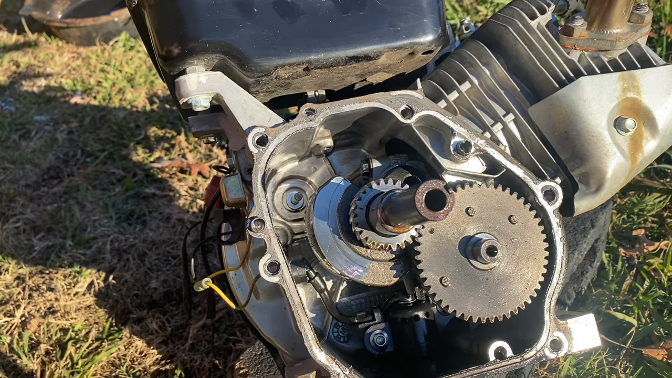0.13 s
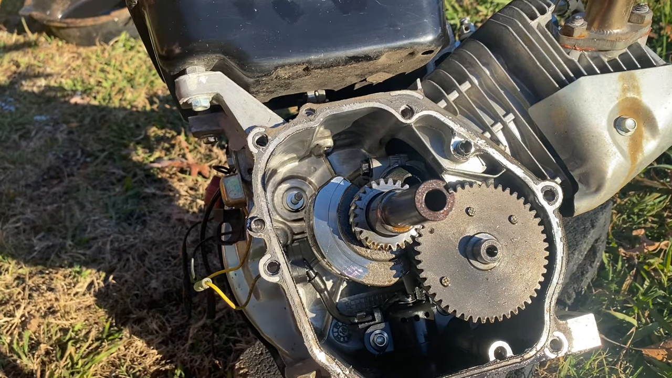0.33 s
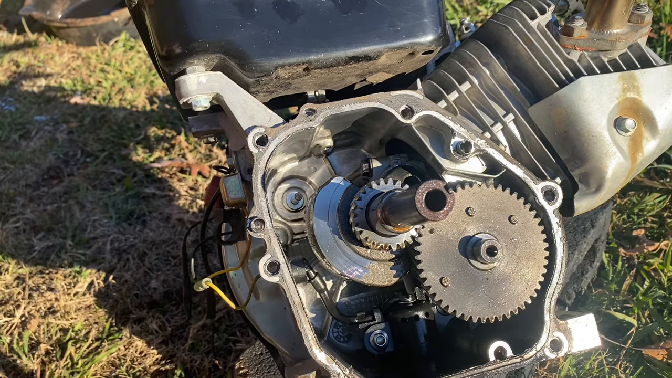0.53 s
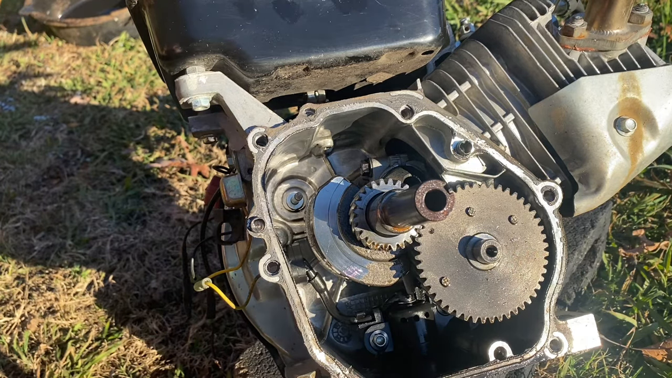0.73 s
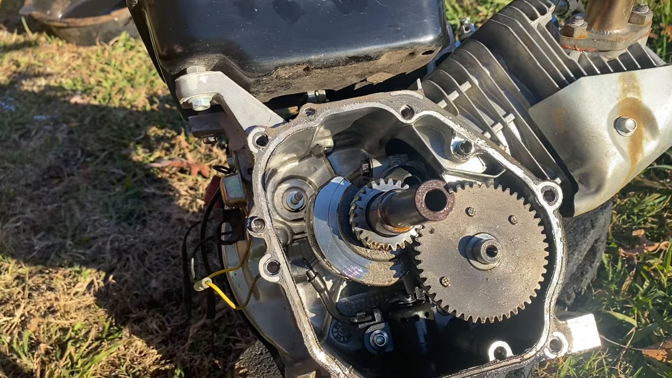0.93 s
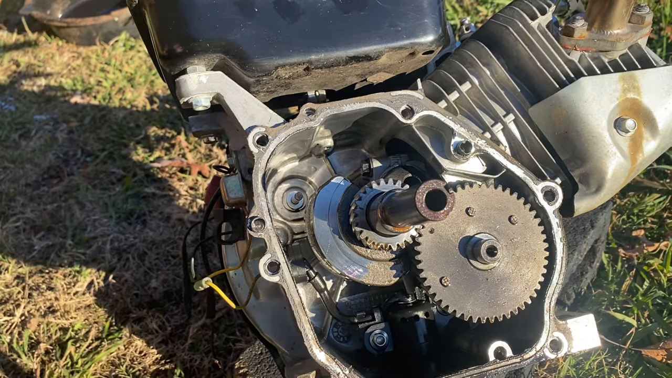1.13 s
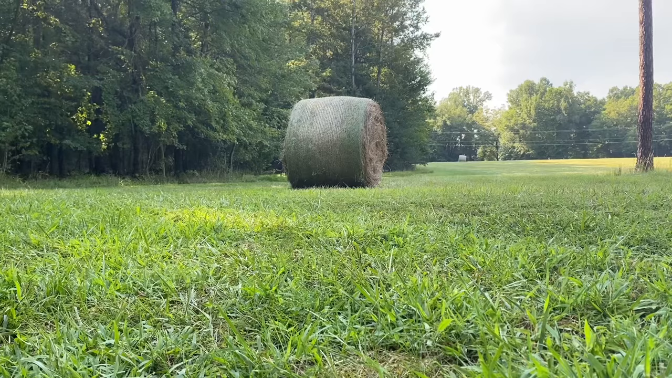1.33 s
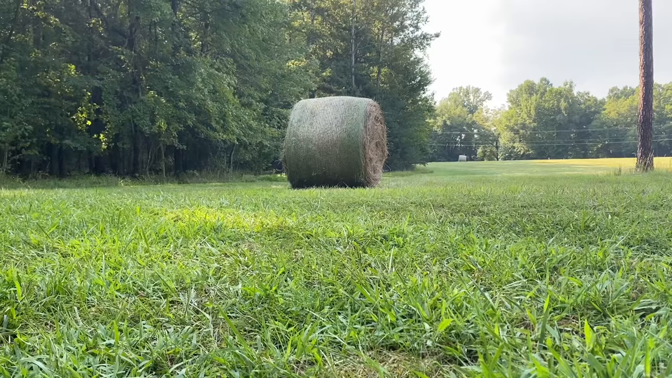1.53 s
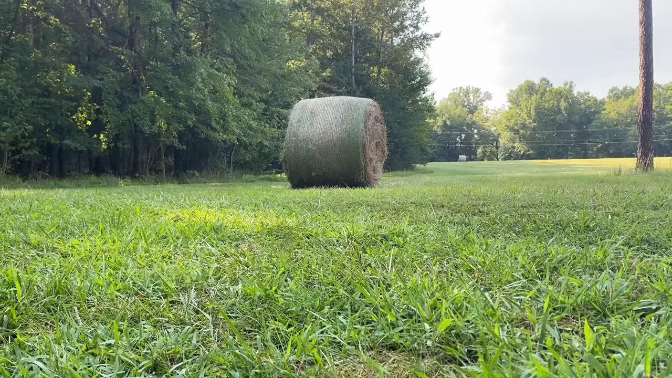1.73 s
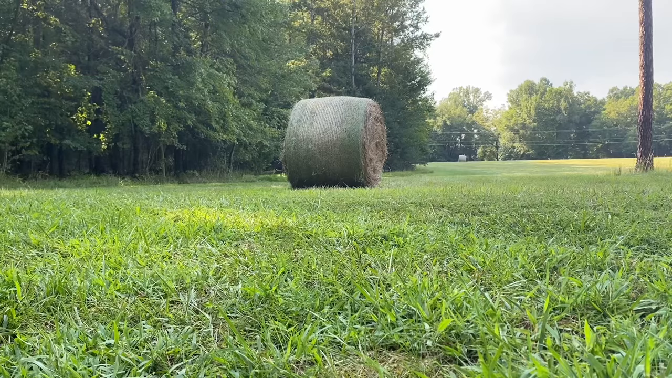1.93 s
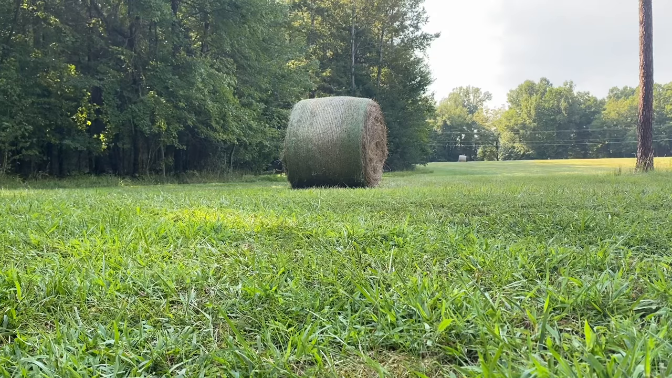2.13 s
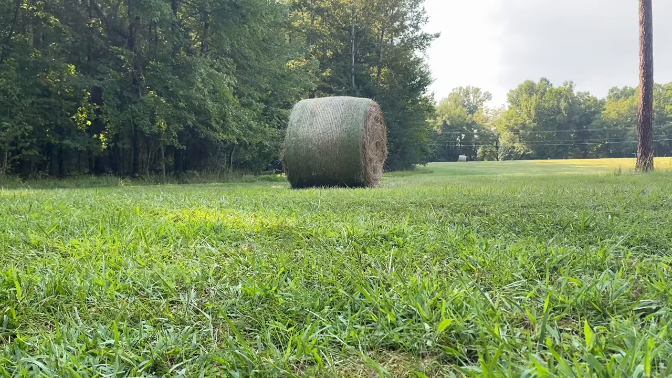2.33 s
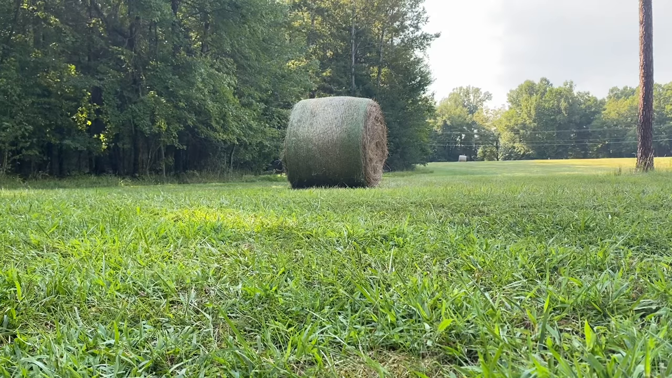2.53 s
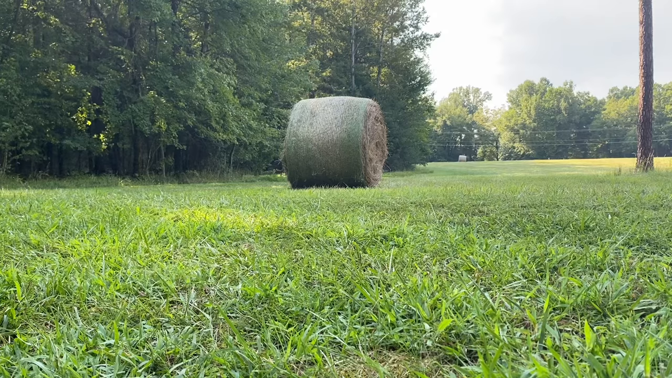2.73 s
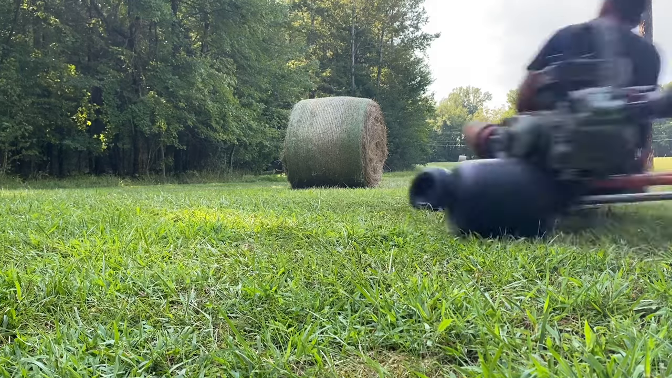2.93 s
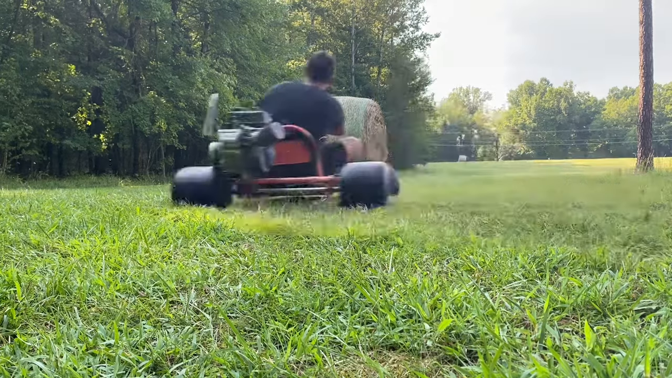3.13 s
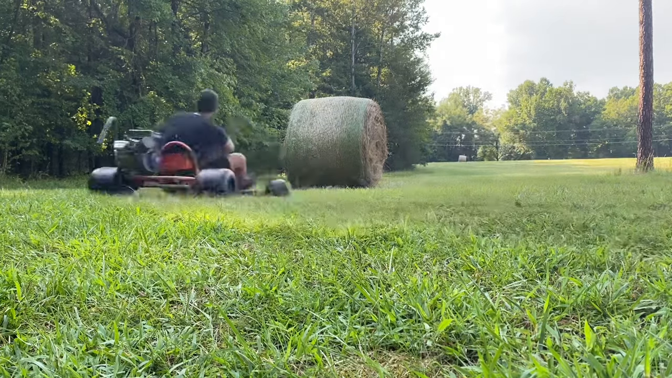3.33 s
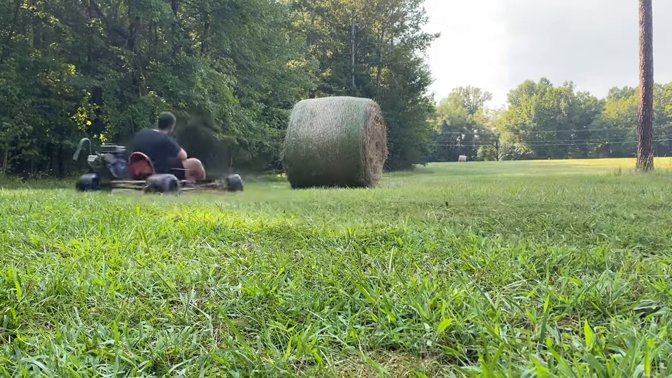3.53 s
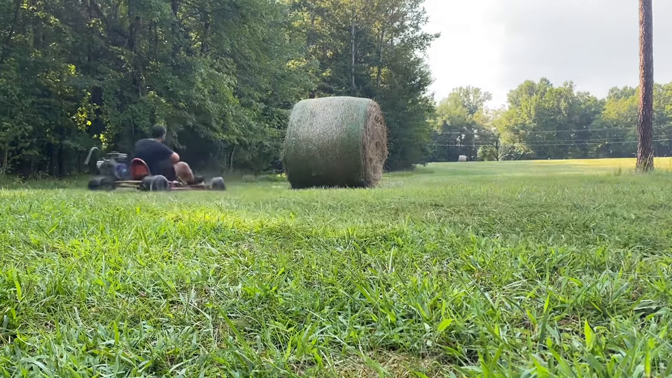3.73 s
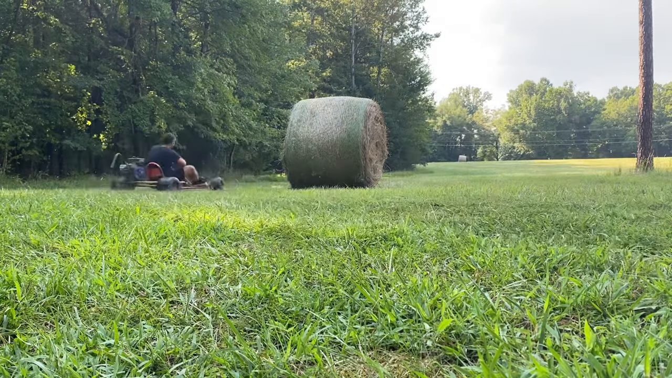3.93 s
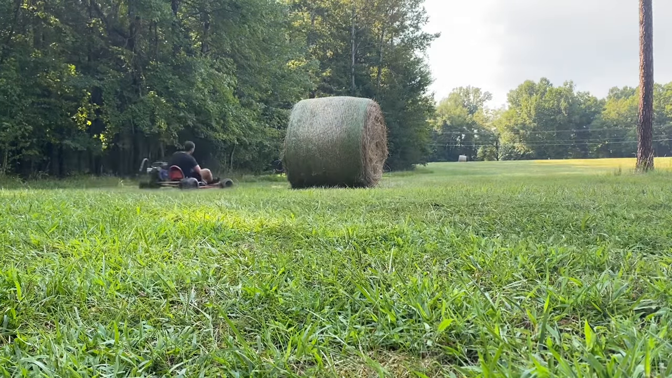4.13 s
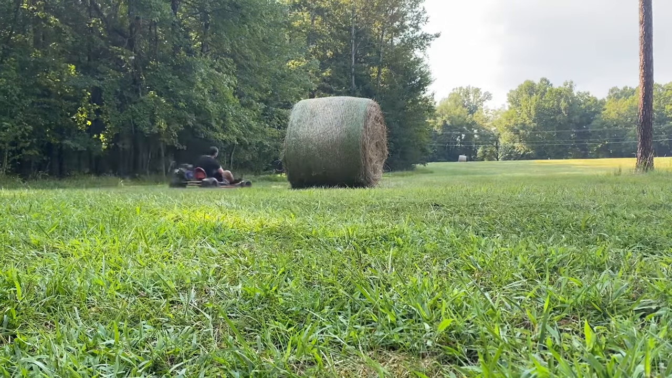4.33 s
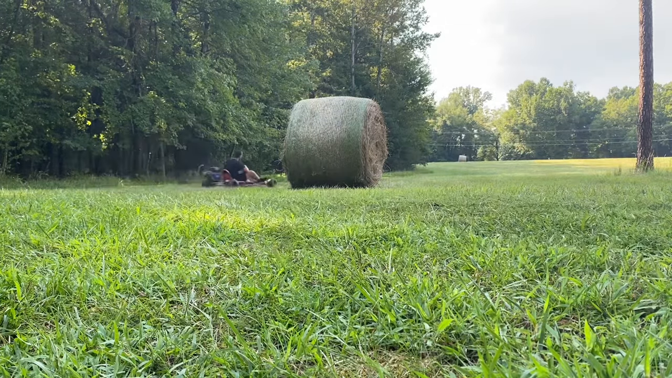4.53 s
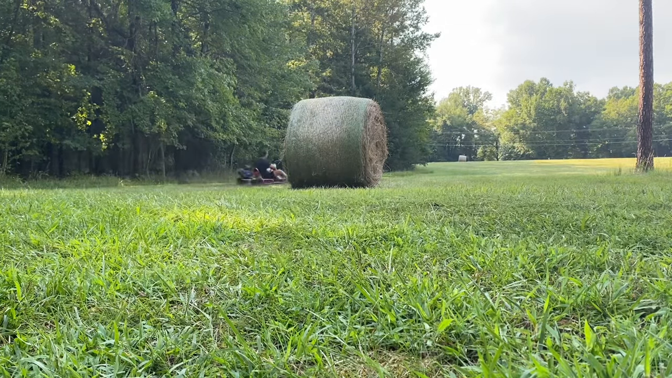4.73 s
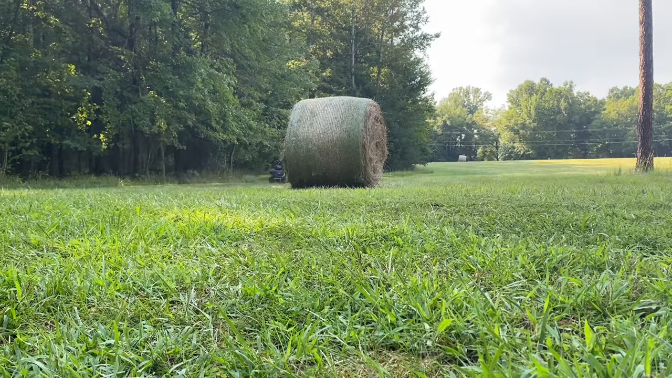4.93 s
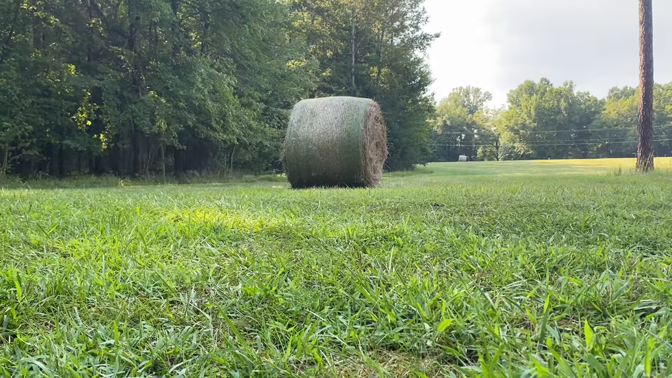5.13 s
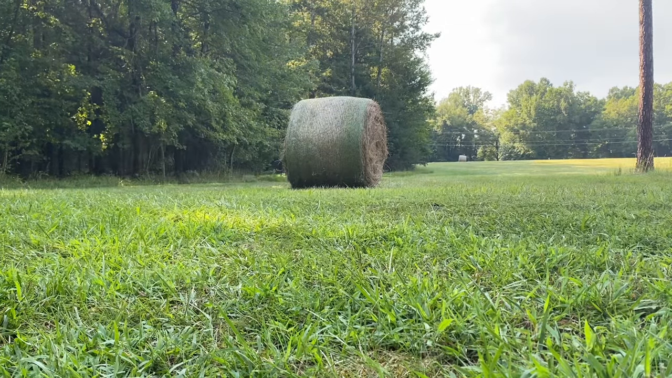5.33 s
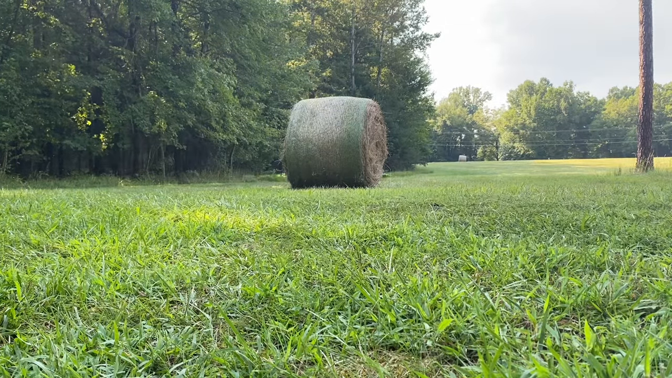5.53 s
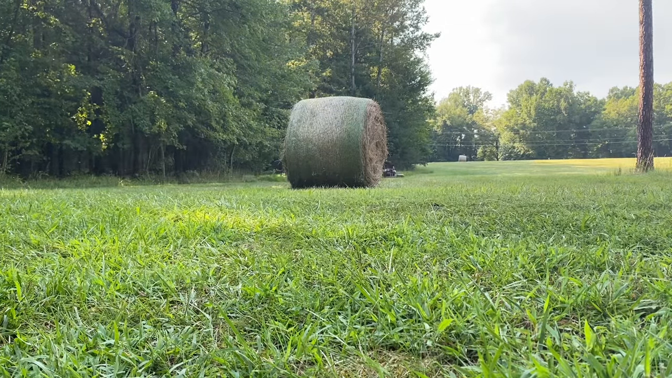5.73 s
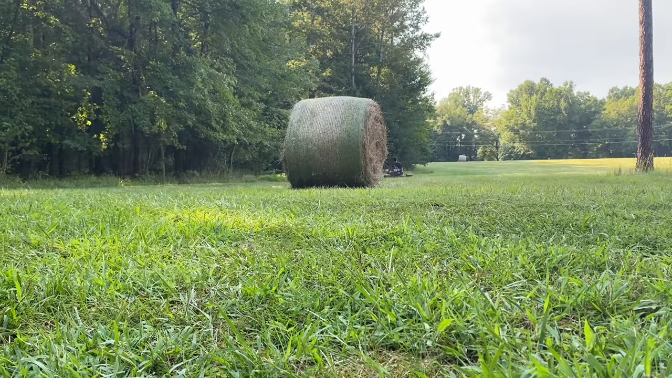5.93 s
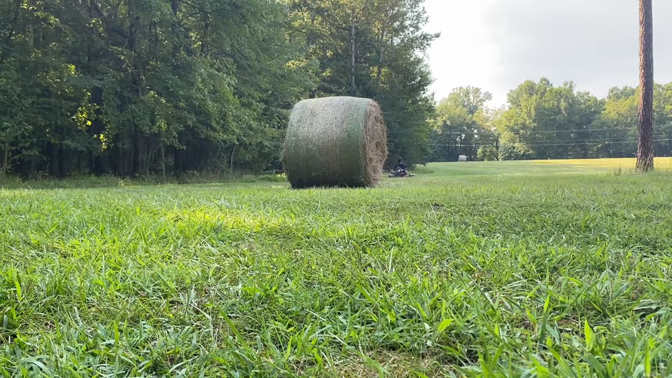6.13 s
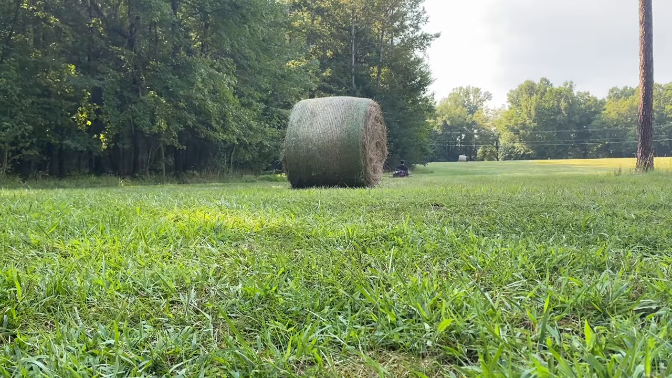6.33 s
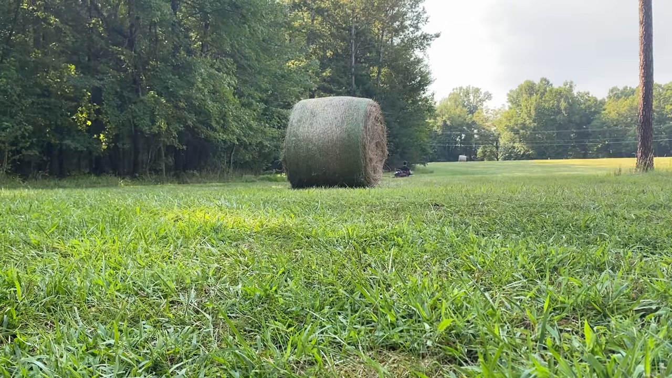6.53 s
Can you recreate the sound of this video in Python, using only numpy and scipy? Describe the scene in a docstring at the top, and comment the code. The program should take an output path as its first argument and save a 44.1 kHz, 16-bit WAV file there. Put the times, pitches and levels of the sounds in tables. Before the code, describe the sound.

A quiet yard with a faint far motor hum cuts abruptly to a go-kart engine roaring up, passing close and droning away over grass.

```python
"""A quiet yard with a far motor hum gives way abruptly to a go-kart on a grass field.
Its single-cylinder four-stroke comes up from behind, passes close by at about 2.9 s and drives off.
Every firing is a burst of noise, the crack of gas, and a click that rings the exhaust's resonances.
Filtered noise makes the yard air, the chain and tyres underneath and a soft rush in the distance."""
import sys
import numpy as np
from scipy import signal
from scipy.fft import rfft, irfft, next_fast_len
from scipy.io import wavfile
from scipy.ndimage import map_coordinates

SR = 44100
rng = np.random.default_rng(int(sys.argv[2]) if len(sys.argv) > 2 else 0)


def unload_audio(sound):
    """Save the sound as a 16-bit wav file, at the path given as the first command line argument."""
    columns = np.transpose(np.atleast_2d(sound))
    # keep every value between -1 and 1, then stretch to whole-number steps
    steps = np.round(np.clip(columns, -1, 1) * 32767)
    wavfile.write(sys.argv[1], SR, steps.astype(np.int16))


N = 289737
TIME = np.arange(N) / SR
KART_START_S = 1.2455
PASS_S, TURN_S = 2.87, 0.092   # when the kart goes by, and how fast its front view turns into its rear view
NEAR_M = 2   # distance at which the near levels hold
CRUISE_HZ = 35.13   # firings per second around which pitch and load vary
TREBLE_LAG_MS = (0.416, -0.021)   # left later than right: from the front, from behind

# Engine speed. Each row: time in seconds, firings per second.
FIRING_RATE = [(1.246, 33.56), (1.62, 34.52), (1.78, 36.73), (2.08, 38.35), (2.18, 39.84), (2.58, 39.77),
               (2.89, 38.61), (3.01, 36.93), (3.24, 35.43), (3.44, 35.44), (3.55, 32.99), (3.7, 34.6),
               (3.86, 33.26), (4.01, 34.41), (4.11, 33.8), (4.57, 34.23), (4.74, 32.69), (4.97, 35.31),
               (5.35, 32.11), (5.64, 34.99), (6.15, 34.65), (6.57, 32.05)]
# Path of the kart. Each row: time in seconds, distance in metres.
KART_DISTANCE = [(1.25, 7.8), (1.95, 4.06), (2.55, 3.81), (2.8, 1.94), (2.97, 2.18), (3.25, 4.26),
                 (4.4, 9.47), (5.05, 15.6), (6.57, 22.3)]


def from_db(db):
    """A level in decibels is twenty times the logarithm of the amplitude gain."""
    return 10 ** (np.asarray(db) / 20)


def rms_one(x):
    """Mean power is the mean squared signal; scale it to one."""
    return x / np.sqrt(np.mean(x ** 2) + 1e-20)


def in_time(rows):
    """Linear interpolation gives each column of a curve at every sample."""
    s, *columns = np.transpose(rows)
    return [np.interp(TIME, s, c) for c in columns]


def panned(db):
    """Level difference between the sides places a sound: left and right gains, positive to the left."""
    return from_db(np.array([[1], [-1]]) * db / 2)


def drift(rate):
    """Slow random modulation: chance points, rate per second, joined by lines; rms 1."""
    points = rng.standard_normal(int(N / SR * rate) + 2)
    return rms_one(np.interp(TIME * rate, np.arange(len(points)), points))


def noise(colour, alike, low_hz=20, high_hz=17000):
    """Spectral shaping of white noise; alike is the left-right correlation; rms 1."""
    size = next_fast_len(N)
    hz = np.arange(size // 2 + 1) * SR / size + 1e-3
    points, alike = np.array(colour), np.clip(alike, 0, 1)
    gain = from_db(np.interp(np.log(hz), np.log(points[:, 0]), points[:, 1]))
    gain = gain / np.sqrt((1 + (low_hz / hz) ** 12) * (1 + (hz / high_hz) ** 12))   # band edges
    mid, side = irfft(rfft(rng.standard_normal((2, size))) * gain, size)[:, :N]
    return rms_one(np.sqrt(1 + alike) * mid + np.sqrt(1 - alike) * np.array([side, -side]))


def ring(x, hz, width_hz):
    """Damped resonance: a unit click starts a decaying sine of height 1, shorter for a greater width."""
    radius = np.exp(-np.pi * width_hz / SR)
    angle = 2 * np.pi * hz / SR
    feedback = [1, -2 * radius * np.cos(angle), radius * radius]
    return signal.lfilter([0, np.sin(angle)], feedback, x + 1e-18)


def swell(s, db, hz, width_hz, length_s):
    """Resonant noise under a bell-shaped envelope: it comes and goes around time s."""
    envelope = np.exp(-((TIME - s) / length_s) ** 2)
    return from_db(db) * envelope * rms_one(ring(rng.standard_normal(N), hz, width_hz))


def passing(front, behind, turn_s=TURN_S):
    """Directivity: a value swings from its front to its rear setting as the kart goes by."""
    return front + (behind - front) * (1 + np.tanh((TIME - PASS_S) / turn_s)) / 2


def carried(near_db, front_db, loss_db):
    """Spreading loss per doubling of distance, with extra level from the front."""
    doublings = np.log2(in_time(KART_DISTANCE)[0] / NEAR_M)
    return from_db(near_db + passing(front_db, 0) - loss_db * doublings)


def behind_bale():
    """Acoustic shadow: how deep the kart is behind a hay bale that hides it for a while, 0-1."""
    centre_s, half_s = 5.418, 0.28
    return np.exp(-((TIME - centre_s) / half_s) ** 2)


def late_left(left, right, lag_ms):
    """Time difference between the sides: delay left against right by the (front, behind) lag."""
    lag = passing(*lag_ms) * SR / 1000   # samples
    n = np.arange(N)
    late = map_coordinates(left, [n - lag / 2], order=3)
    early = map_coordinates(right, [n + lag / 2], order=3)
    return np.array([late, early])


def yard():
    """Superposition of coloured air noise in light gusts, far motor tones, rustles and ticks."""
    # Each row: frequency in Hz, relative spectral level in dB.
    air_colour = [(15, -55), (25, -33), (48, -0.5), (128, -15.5), (176, -24), (415, -36), (450, -39),
                  (1000, -43), (1860, -46), (3350, -56.5), (5570, -58.5), (6540, -65), (15000, -69)]
    # Tones of the far motor. Each row: frequency in Hz, mean level in dB before panning.
    hum_tones = [(59.5, -62), (90, -55.5), (120.4, -52)]
    # Small sounds, then faint rustles. Each row: centre time in seconds, level in dB before panning,
    # resonance in Hz, its width in Hz, length in seconds.
    small_ticks = [(0.123, -67, 5800, 700, .008), (1.105, -52, 1000, 2220, 0.0024)]
    faint_rustles = [(0.4, -79, 1800, 140, .06), (0.82, -64, 800, 700, .013), (0.94, -66, 520, 310, .06),
                     (0.945, -79, 7300, 2500, .015), (0.96, -72, 1910, 110, .19)]
    air = from_db(-50.5) * noise(air_colour, 0.44, high_hz=15000)
    low = signal.sosfilt(signal.butter(2, 110, fs=SR, output="sos"), air)
    gust = from_db(2.3 * drift(11.2) - 10.0)
    out = air + low * (gust - 1)   # the gusts set the level of the lows alone
    for hz, db in hum_tones:
        level = from_db(db + 1.7 * drift(6.0))
        out = out + level * np.sqrt(2) * np.sin(2 * np.pi * hz * TIME + drift(5.8) / 10)
    for row in list(small_ticks) + list(faint_rustles):
        out = out + swell(*row)
    return out * panned(3.0)


def distant_rush():
    """Band-limited noise through one broad resonance: a soft rush swells in the distance."""
    return swell(5.55, -54.5, hz=2850, width_hz=600, length_s=.5)


def running_gear():
    """Friction and impact noise: drive clatter and hiss, tyres rumbling over bumps, a puff of wake."""
    # Level of clatter and hiss between firings, before view and flutter.
    # Each row: time in seconds, level in dB.
    gear_level = [(1.25, -39.5), (1.85, -27.5), (2.2, -27.5), (2.5, -32), (2.8, -29.5), (3.1, -46.5),
                  (3.6, -43.5), (4.8, -47), (6.57, -47.5)]
    # Noise colours. Each row: frequency in Hz, relative spectral level in dB.
    clatter_colour = [(500, 4), (900, -6.5), (1350, -14.5), (1900, -11), (2400, -7), (2900, -7.5),
                      (3700, -10.5)]
    hiss_colour = [(3700, -2.5), (4700, -2.5), (7000, -6.5), (8200, -13.5), (9000, -36), (11300, -10),
                   (13300, -32), (15300, -20)]
    rumble_colour = [(15, -23), (38, -26), (70, -2), (150, -28)]
    clatter_view_db, hiss_view_db = (3.5, 2), (-3, -3)   # from the front, from behind
    clatter_loss_db = 1.35   # per doubling of distance, against the hiss
    wake_s, wake_length_s, wake_db = 2.91, 0.055, -30

    level_db, flutter = in_time(gear_level)[0], drift(90)
    doublings = np.log2(in_time(KART_DISTANCE)[0] / NEAR_M)
    clatter_db = level_db + passing(*clatter_view_db) - clatter_loss_db * doublings
    clatter = from_db(clatter_db + 1.6 * flutter) * noise(clatter_colour, 0.48, low_hz=464, high_hz=3470)
    hiss_db = level_db + passing(*hiss_view_db)
    hiss = from_db(hiss_db + 0.95 * flutter) * noise(hiss_colour, 0.13, low_hz=3410)
    wake = from_db(wake_db) * np.exp(-((TIME - wake_s) / wake_length_s) ** 2)
    rumble_gain = carried(near_db=-33, front_db=5.7, loss_db=11) + wake
    rumble = rumble_gain * from_db(drift(22)) * noise(rumble_colour, 0.4, low_hz=11, high_hz=225)
    return late_left(*(clatter + hiss), TREBLE_LAG_MS) + rumble * panned(2.5)


def firings():
    """Phase accumulation: the exhaust valve opens once per engine cycle; returns its samples."""
    cycles = np.cumsum(in_time(FIRING_RATE)[0] * (TIME > KART_START_S)) / SR
    return np.flatnonzero(np.diff(np.ceil(cycles)) > 0)


def clicks(at, spread_db):
    """Impulse excitation, one click per firing; no two burns are equally strong."""
    out = np.zeros(N)
    out[at] = from_db(spread_db * np.clip(rng.standard_normal(len(at)), -2, 2))
    return out


def burst(push, rise_s, fall_s, tail_s, tail_db):
    """Envelope of escaping gas: a quick swell, a quick fall and a weaker blow-down; rms 1."""
    lead = SR // 200   # the swell begins 5 ms ahead of the click
    t = np.arange(-lead, 5 * lead) / SR
    after = np.maximum(t, 0)
    fall = np.exp(-after / fall_s) + from_db(tail_db) * np.exp(-after / tail_s)
    shape = np.exp(np.minimum(t, 0) / rise_s) * fall
    return rms_one(signal.fftconvolve(push, shape)[lead:lead + N])


def gas_crack(at):
    """Jet turbulence at the pipe mouth: noise bursts whose colour changes from firing to firing."""
    # Level of the crack's treble apart from distance, before each band's share.
    # Each row: time in seconds, level in dB.
    snap = [(1.25, -40), (1.85, -19.5), (2.1, 2.5), (2.42, 0), (2.75, -2), (3.05, -1), (3.38, 2),
            (3.72, -4), (4.1, 3.5), (4.5, 3), (4.7, -4.5), (5.0, 0.5), (5.8, 0.5), (6.25, 4), (6.57, -5.5)]
    # Each row: frequency in Hz, relative spectral level in dB.
    crack_colour = [(700, 5), (1300, 2), (2000, 6), (2900, 18), (3900, 6.5), (5000, 5.5), (7500, -2),
                    (9000, -23), (11300, -5), (13300, -24), (15300, -9.5)]
    # Each row: low edge in Hz, high edge in Hz.
    crack_bands = [(800, 2600), (2600, 4200), (4200, 8500), (8500, 17000)]
    # How each band carries. Each row: near level in dB, extra dB from the front, dB lost per doubling
    # of distance, share of the snap (factor), left-right difference in dB from behind.
    crack_carry = [(-24, 6, 17.5, 0.31, 5), (-25, -1, 13, 0.41, 11.5), (-27.5, 9.5, 8, 0.73, 4),
                   (-27.5, -10, 5.5, 1.42, 0)]
    snap_db = in_time(snap)[0] - 15.5 * behind_bale()
    push, out = clicks(at, 0.89), 0
    for (low, high), (near_db, front_db, loss_db, share, side_db) in zip(crack_bands, crack_carry):
        band_push = push * clicks(at, 2.3)
        gate = burst(band_push, rise_s=0.00054, fall_s=0.00036, tail_s=0.0029, tail_db=-1.5)
        gain = carried(near_db, front_db, loss_db) * from_db(share * snap_db)
        gas = noise(crack_colour, .96, low, high)
        out = out + gain * gate * gas * panned(passing(0, side_db))
    return late_left(*out, TREBLE_LAG_MS)


def exhaust(at, modes, low_hz, high_hz, burn_db, mode_db):
    """Modal resonance: firings ring the pipe, neighbours in opposite senses; motion and revs shift all."""
    doppler = passing(1.024, 0.95, turn_s=0.67)   # factor on the pipe's resonances
    # hotter gas at high revs raises them too
    pitch = doppler + 0.0058 * (in_time(FIRING_RATE)[0] - CRUISE_HZ)
    clock = np.cumsum(pitch)   # the kart's own time, in samples
    fired = np.minimum(clock[at], N - 1).astype(int)
    push = clicks(fired, burn_db)
    rings = 0
    for k, (hz, width_hz, db) in enumerate(modes):
        mode_push = push * clicks(fired, mode_db)
        rings = rings + (-1) ** k * from_db(db) * ring(mode_push, hz, width_hz)
    rings = signal.sosfilt(signal.butter(2, [low_hz, high_hz], "band", fs=SR, output="sos"), rings)
    return rms_one(np.interp(clock, np.arange(N), rings))


def exhaust_boom(at):
    """Low pipe modes: on approach the boom reaches the left later than the right, more than the treble."""
    # Level before drone and panning. Each row: time in seconds, level in dB.
    boom_level = [(1.27, -16.5), (1.81, -12.5), (2.3, -15), (2.39, -18.5), (2.84, -17.5), (3.2, -24.5),
                  (4.51, -30.5), (4.73, -34.5), (5.52, -32.5), (6.55, -34.5)]
    # Each row: resonance in Hz, width in Hz, relative height in dB.
    boom_modes = [(77, 14.8, -15.5), (147.3, 69.7, 1), (220.7, 75.4, 4.5), (249.44, 32.7, -3)]
    drone_hz, drone_width_hz = 249.6, 40
    pipe = exhaust(at, boom_modes, low_hz=26.1, high_hz=930, burn_db=0.57, mode_db=0.81)
    boom = -from_db(in_time(boom_level)[0]) * pipe
    # from far in front, one muffler resonance stands out of the boom
    drone = passing(0.18 * in_time(KART_DISTANCE)[0], 0.082)
    muffler = signal.lfilter(*signal.iirpeak(drone_hz, drone_hz / drone_width_hz, fs=SR), boom)
    boom = (boom + drone * muffler) / (1 + 0.24 * drone)
    return late_left(*(boom * panned(passing(3, 2))), (1.18, -0.029))


def growl_heard(growl, lag_ms):
    """Comb filtering: an echo from the trees sweeps through the upper harmonics."""
    # shorter as the kart nears and longer as it leaves
    echo_s = .012 + .0025 * in_time(KART_DISTANCE)[0]
    growl = growl + from_db(passing(-12, -16)) * np.interp(TIME - echo_s, TIME, growl)
    # bark and rasp harden by 0.5 dB per Hz as the revs fall under load
    lug = from_db(.5 * (CRUISE_HZ - in_time(FIRING_RATE)[0]))
    return late_left(*(lug * growl * panned(passing(-4, 3.5))), lag_ms)


def exhaust_note(at):
    """Superposition of the pipe's modes in three ranges: boom, bark and rasp."""
    # Pipe resonances. Each row: frequency in Hz, width in Hz, relative height in dB.
    bark_modes = [(344.2, 73.6, 1.5), (432.4, 17, -16), (430.3, 68, -4.5), (593.4, 36.4, -14.5)]
    rasp_modes = [(725, 60, 0), (800, 110, -4), (930, 110, -12), (1150, 130, -15)]
    boom = exhaust_boom(at)
    bark = exhaust(at, bark_modes, low_hz=154, high_hz=1050, burn_db=1.2, mode_db=-0.5)
    bark = bark * carried(near_db=-19.5, front_db=3.1, loss_db=6.7)
    # from far in front the rasp stands out too, by 1.3 dB per metre; the bale takes it away
    rasp_db = passing(1.3 * in_time(KART_DISTANCE)[0], 0) - 32 * behind_bale()
    rasp = exhaust(at, rasp_modes, low_hz=493, high_hz=1250, burn_db=1.65, mode_db=1.2)
    rasp = rasp * from_db(rasp_db) * carried(near_db=-32, front_db=3.1, loss_db=7.97)
    return boom + growl_heard(bark, (0.75, -0.039)) + growl_heard(rasp, (0.49, -0.024))


def scene():
    """Superposition of sources: the yard, then all at once the kart on the field."""
    at = firings()
    field = exhaust_note(at) + gas_crack(at) + running_gear() + distant_rush()
    return np.where(TIME < KART_START_S, yard(), field)


def record(dry):
    """Soft saturation rounds the highest peaks and a steep low-pass cuts the top."""
    rounded = dry / (1 + (dry / .9) ** 6) ** (1 / 6)
    return signal.sosfilt(signal.ellip(10, .2, 90, 16500, fs=SR, output="sos"), rounded)


dry = scene()
out = record(dry)
unload_audio(out)
```